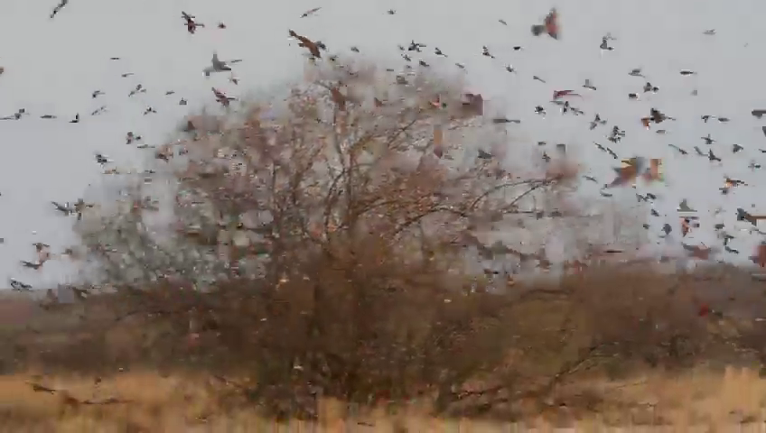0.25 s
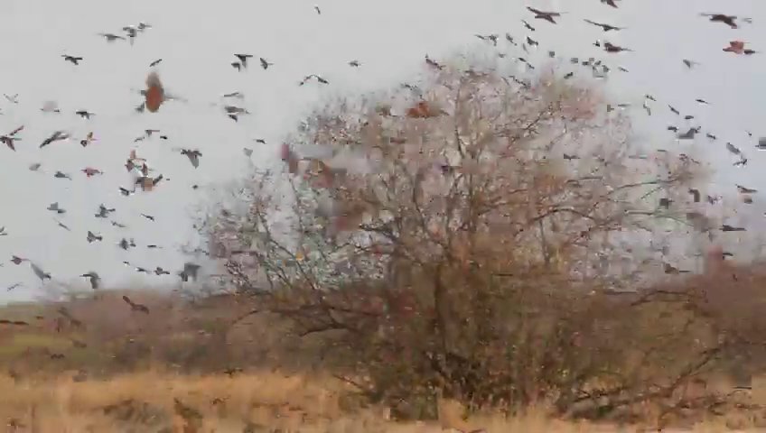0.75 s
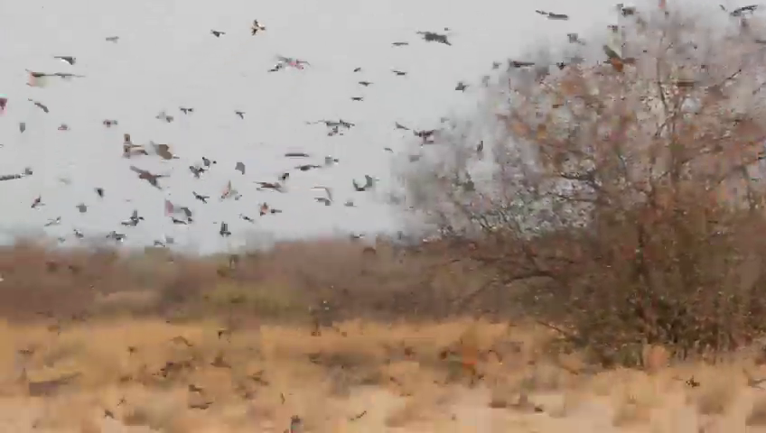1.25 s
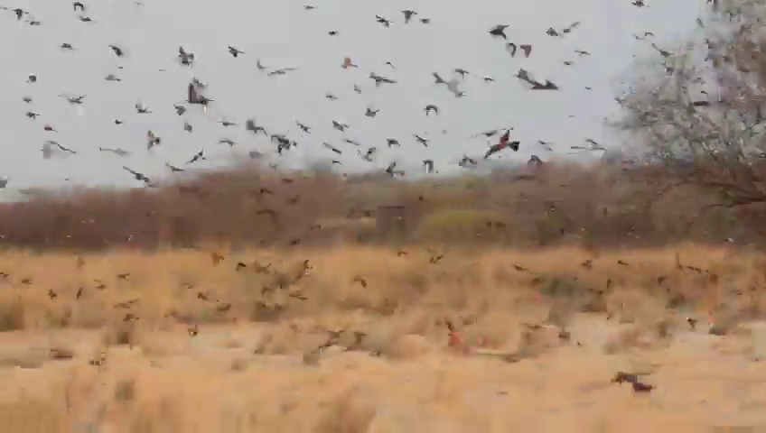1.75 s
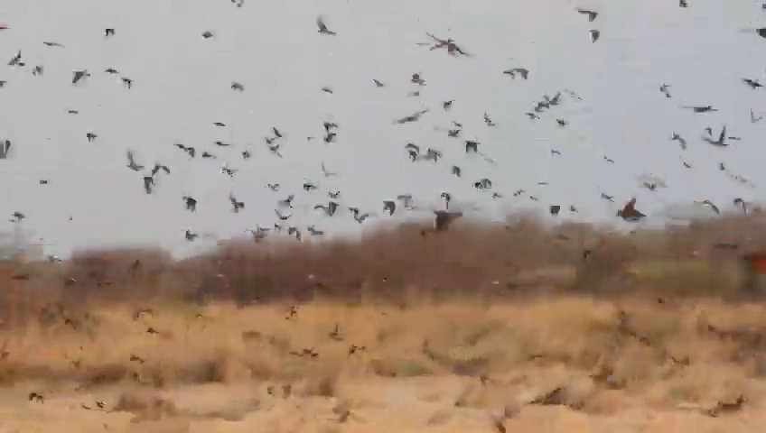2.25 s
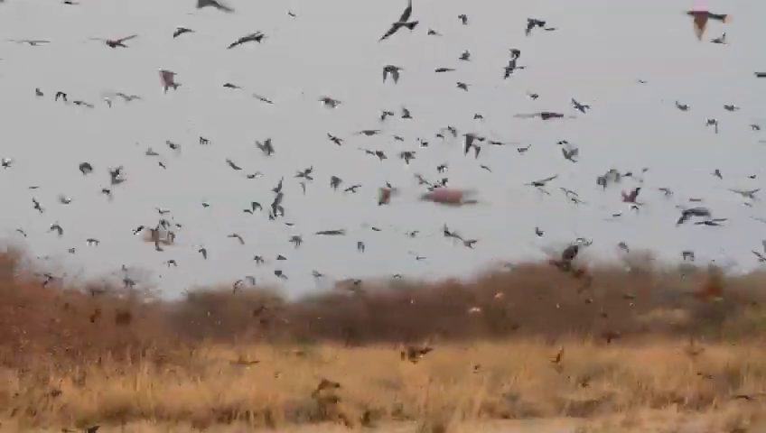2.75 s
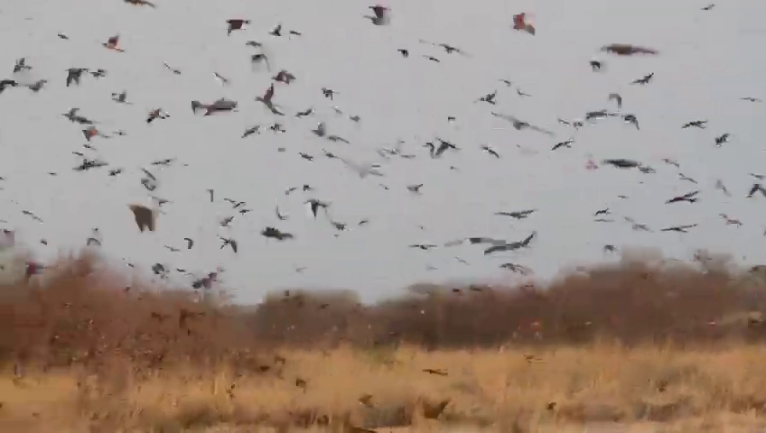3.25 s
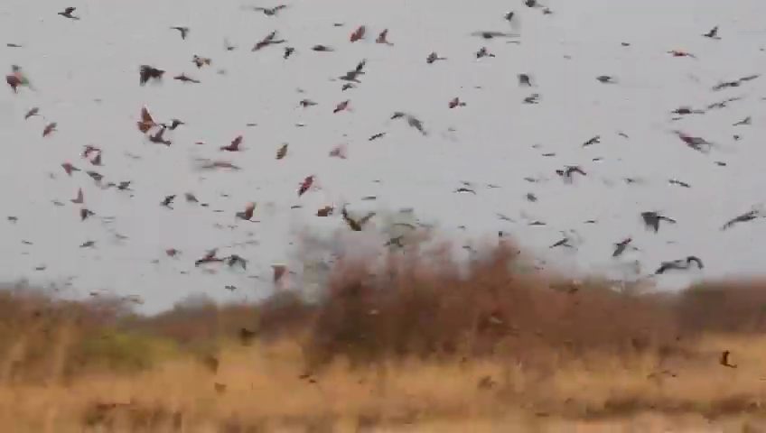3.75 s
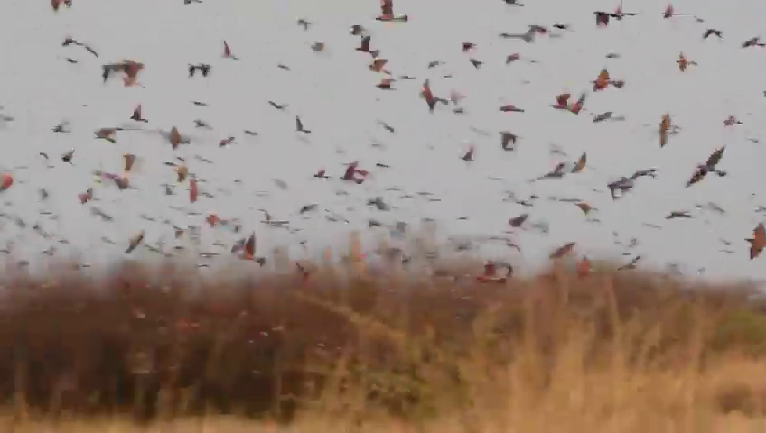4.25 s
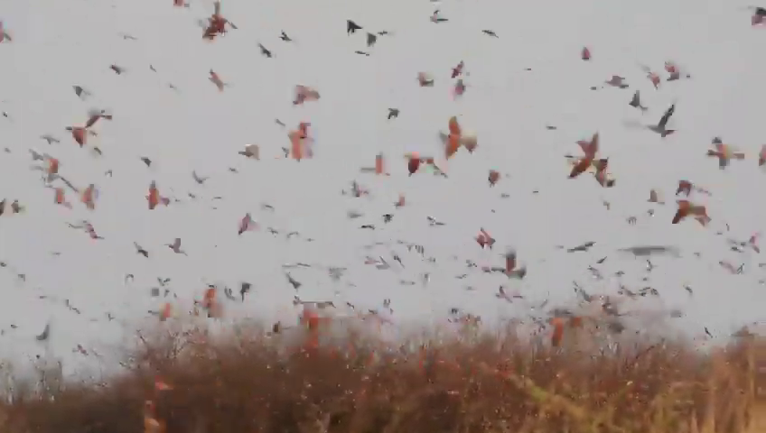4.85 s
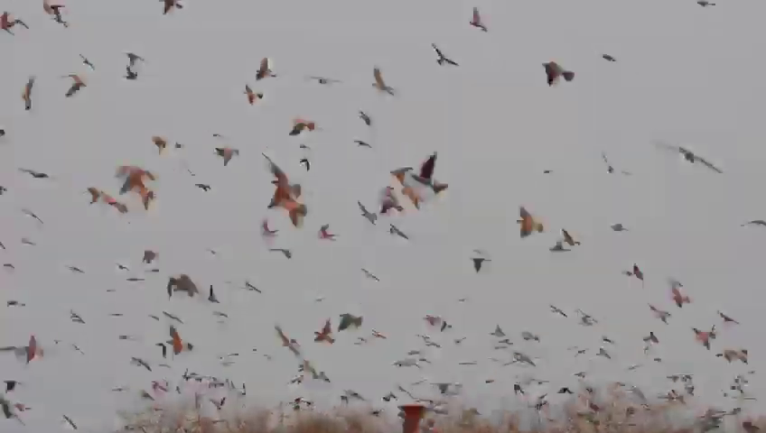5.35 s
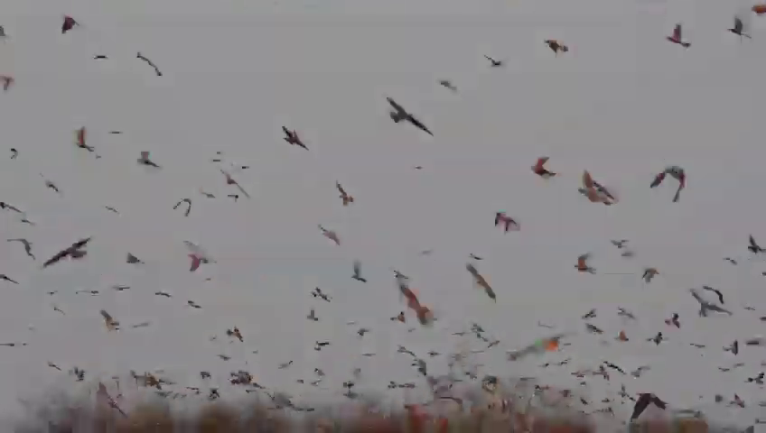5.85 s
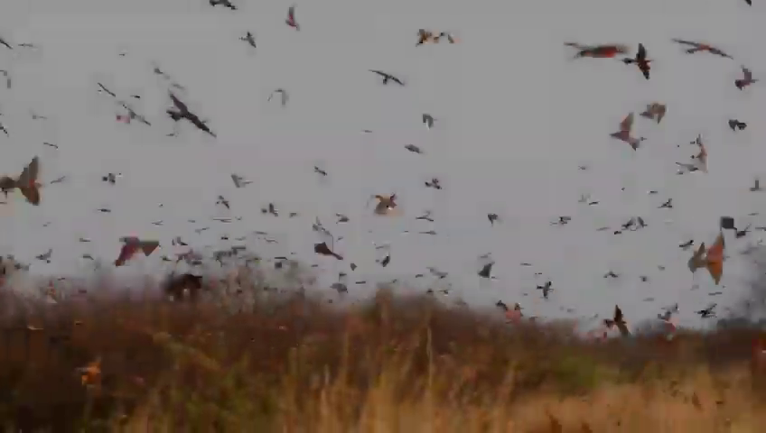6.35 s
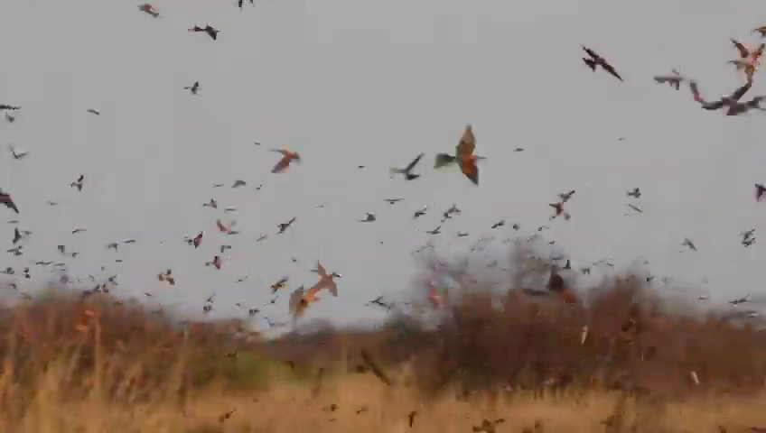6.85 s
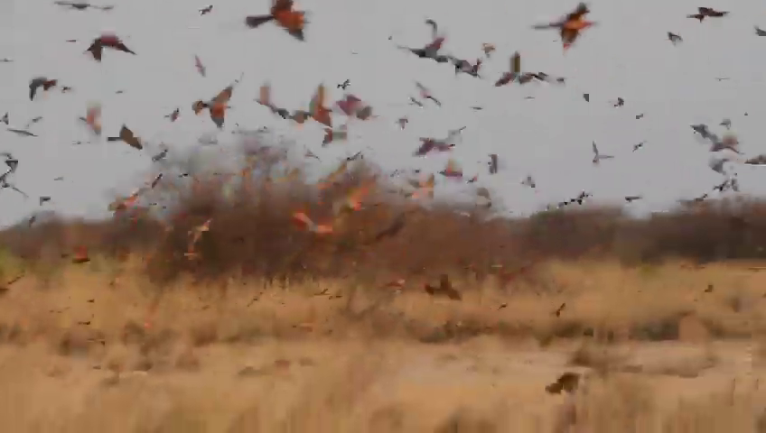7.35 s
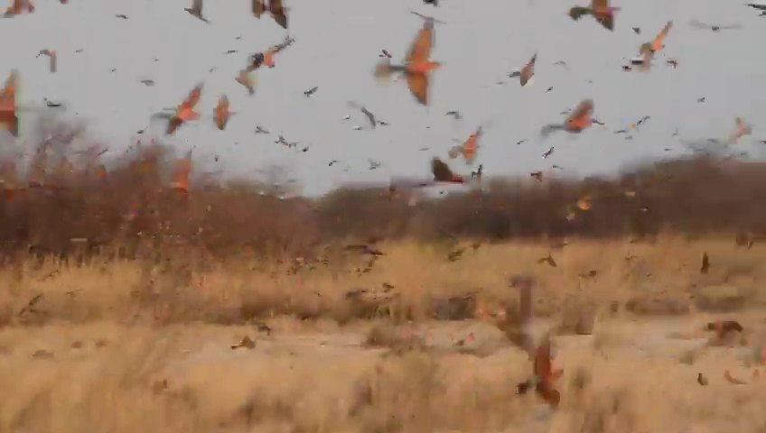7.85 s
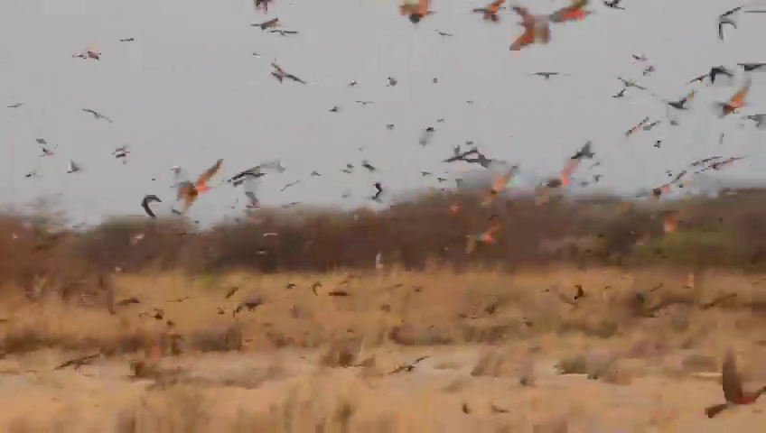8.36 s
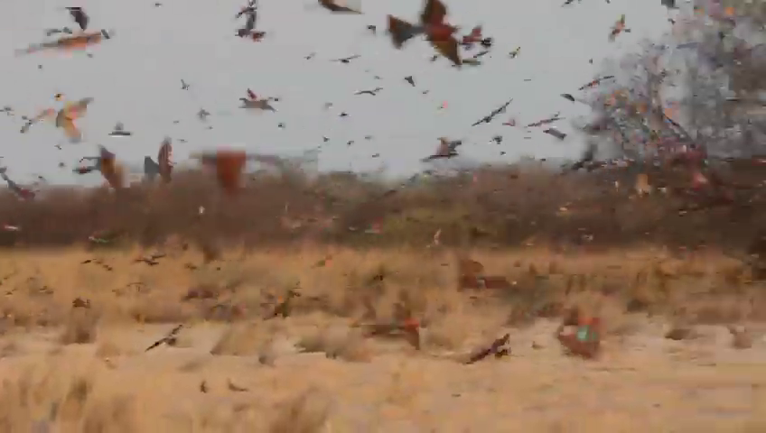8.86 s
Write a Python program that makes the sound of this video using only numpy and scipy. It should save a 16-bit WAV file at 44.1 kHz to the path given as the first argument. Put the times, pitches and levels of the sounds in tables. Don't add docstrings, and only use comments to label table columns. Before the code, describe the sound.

A large flock of bee-eaters over dry grass quickly fades in as a dense chorus of short, trilled croaks. Nearby birds call over it, the closest bursting out around two and a half seconds, and later calls sound duller. A low camera motor hums and rattles underneath, and a hand thumps the body near six seconds. Open air, close stereo microphones with a narrow image and little high treble.

```python
import sys
import numpy as np
from scipy import signal
from scipy.fft import rfft, irfft
from scipy.io import wavfile
from scipy.ndimage import uniform_filter1d

SR = 44100
rng = np.random.default_rng(int(sys.argv[2]) if len(sys.argv) > 2 else 0)


def boost(x):
    u = np.asarray(x, float) / 20
    return 10 ** u


def wav_out(sig):
    wavfile.write(sys.argv[1], SR, np.round(np.clip(np.atleast_2d(sig).T, -1, 1) * 32767).astype(np.int16))


N = 400869
MOTOR_HZ = 64.5
FADE_S = 0.35
PORTS = np.array([[1], [-1]])

# time in seconds, chorus level in dB.
FLOCK = [(0.0, -47), (0.15, -37.5), (0.35, -32), (1.57, -31), (2.05, -27), (2.3, -31), (2.83, -33.5),
         (2.99, -29.5), (3.42, -34), (3.67, -30), (3.97, -34), (4.66, -32.5), (5.57, -30.5), (5.75, -34),
         (6.89, -33.5), (8.36, -33.5), (9.09, -34)]


def evened(x):
    return x / np.sqrt(np.mean(x ** 2) + 1e-20)


def curve(rows, axis):
    return np.interp(np.arange(N) / SR, [r[0] for r in rows], [r[axis] for r in rows])


def colour(x, points):
    f, db = np.transpose(points)
    hz = np.fft.rfftfreq(N, 1 / SR)
    gain_db = np.interp(np.log(hz + 1), np.log(f), db)
    return irfft(rfft(x) * boost(gain_db), N)


def add(mix, s, sound):
    part = mix[..., round(s * SR):][..., :sound.shape[-1]]
    part += sound[..., :part.shape[-1]]


def wobble(count, size, smooth):
    noise = rng.standard_normal((count, size), dtype=np.float32)
    return evened(uniform_filter1d(uniform_filter1d(noise, smooth), smooth))


def air():
    # frequency in Hz, level in dB.
    wash_tone = [(15, -38), (40, -33), (100, -17), (300, -17.5), (600, -20.5), (1000, -5), (1900, 0.5),
                 (2300, 6), (3300, -16), (4500, -23.5), (8000, -32), (12400, -48)]
    # frequency in Hz, level in dB.
    hiss_tone = [(3000, -24), (5000, -31), (7000, -1.5), (9000, -1.5), (11000, -1), (11800, -8),
                 (12400, -14)]
    noise = rng.standard_normal((4, N))
    wash = colour(noise[0] + 0.029 * noise[1] * PORTS, wash_tone)
    hiss = colour(noise[2:], hiss_tone)
    return boost(-40) * evened(wash) + boost(-66.5) * evened(hiss)


def motor():
    # multiple of the motor turn rate, level in dB.
    orders = [(1, -62), (2, -57), (3, -55), (4, -60), (5, -74.5), (6, -66.5), (6.5, -88), (7, -65),
              (8, -63.5), (9.75, -61), (10.75, -58), (11.75, -57.5), (12.75, -65.5)]
    # time in seconds, hum level in dB.
    load = [(0.0, -67), (0.2, -51.5), (3.14, -50), (3.8, -54), (4.71, -53), (5.8, -54.5), (7.2, -54),
            (9.09, -57)]
    turn = 2 * np.pi * MOTOR_HZ * np.arange(N) / SR
    skew, drift_db = .2, .4
    hum = 0
    for k, db in orders:
        late = 0 if k > 1 else np.pi
        level = boost(db + drift_db * (1 + k / 3) * wobble(1, N, smooth=6000))
        hum = hum + level * np.cos(k * (turn - late - .45 * k) + skew * PORTS / k)
    return boost(curve(load, axis=1)) * evened(hum) * boost(.2 * PORTS)


def rattle():
    # frequency in Hz, level in dB.
    shell = [(150, -33), (280, -12), (400, 2), (600, 5), (900, -14), (1300, -29), (2500, -58)]
    # time in seconds, knocks in dB, buzz in dB.
    grip = [(0.0, -61, -64), (0.35, -53.5, -47.5), (1.04, -51.5, -56.5), (1.39, -48.5, -50),
            (2.3, -46.5, -59), (2.71, -50.5, -50.5), (3.1, -46, -57), (3.64, -46.5, -76), (4.38, -57, -70),
            (4.84, -56, -56), (5.32, -55.5, -67), (6.15, -46.5, -55), (6.5, -49, -52.5),
            (6.99, -41.5, -51.5), (7.8, -51.5, -54), (8.3, -59.5, -65), (9.09, -57, -64)]
    count = int(N / SR * MOTOR_HZ)
    size, pitch, late, side = rng.standard_normal((count, 4)).T
    knocks, t = np.zeros((2, N)), np.arange(600) / SR
    spread_db = 1.6
    for k in range(count):
        ring = np.sin(2 * np.pi * 810 * (1 + .08 * pitch[k]) * t)
        ring *= np.minimum(t / .0016, 1) * boost(-60 * t / .016)
        s = (k + 0.4014 + 0.02 * late[k]) / MOTOR_HZ
        add(knocks, s, boost(spread_db * size[k]) * ring * (1 + 0.033 * side[k] * PORTS))
    buzz = colour(rng.standard_normal(N) + 0.11 * rng.standard_normal(N) * PORTS, shell)
    knocks = boost(curve(grip, axis=1) - 2.0) * evened(knocks)
    return knocks + boost(curve(grip, axis=2) - 4.0) * evened(buzz)


def handling():
    # start in seconds, level in dB, frequency in Hz.
    bumps = [
        (0.189, -58, 56.5),
        (0.269, -54, 67),
        (0.389, -51, 75.4),
        (0.679, -56, 113),
        (0.738, -57, 113),
        (4.569, -63, 113),
        (5.219, -54, 113),
        (5.78, -59, 112),
        (5.879, -39.5, 113),
        (7.869, -65, 64.6),
    ]
    # start in seconds, level in dB, frequency in Hz, 60 dB decay in seconds.
    knock = (6.24, -45, 420, .07)
    out, t = np.zeros(N), np.arange(8000) / SR
    for s, db, hz, t60 in [(*row, 0.084) for row in bumps] + [knock]:
        decay = boost(db - 60 * t / t60) * np.minimum(t / 0.0031, 1)
        add(out, s, decay * np.sin(2 * np.pi * hz * t))
    return out * boost([[3], [-3]])


def croaks(s, db, hz, length, partials_db, arch, fall, trill, rough, spread, breath=.4):
    # frequency in Hz, level in dB.
    throat = [(20, 6.5), (2900, 1.5), (3150, -3.5), (3350, -3.5), (3550, 1.5), (3900, 1), (4300, -3.5),
              (12200, -2), (12450, -38), (22050, -60)]
    hz, length = hz[:, None], np.clip(length, .015, .07)[:, None]
    t = np.arange(3100, dtype=np.float32) / SR
    u = np.minimum(t / length, 1)
    chance = rng.random((len(s), 5)).T[..., None]
    beat = 2 * np.pi * ((120 + 70 * chance[0]) * t + chance[1])
    beat = beat + 1.216 * wobble(len(s), len(t), smooth=150)
    flutter = wobble(len(s), len(t), smooth=45)

    sag = fall * (.15 + 1.6 * chance[2]) * (.3 - u ** 1.8)
    pitch = hz * (1 - arch * np.exp(-u / .12) + sag)
    pitch *= 1 + .015 * np.sin(beat + 1.3) + rough * flutter
    turn = np.exp(2j * np.pi * np.cumsum(pitch, 1) / SR).astype(np.complex64)

    shape = np.minimum(u / .17, 1) * (.6 + .4 * np.sin(np.pi * u)) * np.minimum((1 - u) / .15, 1)
    shape *= np.maximum(1 + trill * (.5 + chance[3]) * np.sin(beat) + .25 * flutter[::-1], .05)
    rasp = 1 + breath * wobble(len(s), len(t), smooth=20)
    voice, partial = np.zeros(turn.shape, np.float32), turn
    for k in range(partials_db.shape[1]):
        voice += boost(partials_db[:, k, None]) * partial.imag * (rasp if k > 1 else 1)
        partial = partial * turn
    voice *= shape * boost(db)[:, None]

    lead = spread * (2 * chance[4] - 1)
    out = np.zeros((2, N))
    for at, sound, early in zip(s, voice, lead):
        add(out, at, np.array([sound, early * sound]))
    side = np.gradient(out[1])
    return colour(np.array([out[0] + side, out[0] - side]), throat)


def far_birds():
    # multiple of the fundamental, level in dB.
    overtones = [(1, -9.5), (3, -24), (4, -33), (5, -35), (6, -48), (7, -44), (8, -44)]
    when, pitch, size, far, long, low = rng.random((1550, 6)).T
    partials_db = np.array([[db for k, db in sorted(overtones + [(2, 0.045)])]])
    partials_db = partials_db + np.outer(14 * (low - .6), np.arange(8) == 0)
    birds = croaks(when * N / SR, -17 * far, 1200 + 170 * (pitch + size), .025 + 0.03034 * long,
                   partials_db, arch=0.1014, fall=.27, trill=0.79, rough=.017, spread=.6)
    return boost(curve(FLOCK, axis=1) + 0.5) * evened(birds)


def passing_birds():
    late, pitch, far, long, bright = rng.random((110, 5)).T
    s = (np.arange(len(late)) + late) / len(late) * (N / SR - .3) + .2
    top_db = -50 + 14 * bright
    partials_db = np.transpose([-16 + 11 * far, 0 * s, top_db + 22, top_db + 14, top_db + 4.5,
                                top_db - 10, top_db - 2.5, top_db - 4])
    birds = croaks(s, -8 * far, 1200 + 230 * pitch, .025 + .03 * long,
                   partials_db, arch=.05, fall=.26, trill=0.21, rough=.012, spread=0.4)
    return boost(curve(FLOCK, axis=1) - 2.5) * birds


def squeaks():
    # start in seconds, level in dB, second partial in Hz, partials 3-5 in dB, length in seconds.
    calls = [
        (8.817, -44.5, 2770, 10, 0.027),
        (8.83, -47, 3250, 5, 0.039),
        (2.905, -28, 2900, -13, 0.042),
        (3.555, -33, 2750, -13.5, 0.064),
        (8.405, -37, 2800, -8.5, 0.0326),
        (7.1, -35.5, 2850, -8, 0.035),
    ]
    s, db, hz, mid_db, length = np.transpose(calls)
    top_db = mid_db - 20.5
    partials_db = np.transpose([0 * s - 8, 0 * s, mid_db, mid_db - 11, mid_db - 15,
                                top_db - 7, top_db - 6, top_db])
    return croaks(s, db, hz / 2, length, partials_db, arch=.1, fall=.12, trill=.3, rough=.012, spread=.5)


def near_birds():
    # start in seconds, level in dB, second partial in Hz,
    # partials 6-9 in dB, length in seconds.
    facing = [(0.476, -15, 2813, -37.5, .056), (0.918, -13, 2856, -36, 0.045),
              (0.959, -16, 2775, -35, .048), (1.235, -17.5, 2734, -26, 0.031),
              (1.333, -12, 2800, -36, 0.045), (1.518, -11.5, 2735, -34.5, 0.047),
              (1.879, -12, 2756, -29, 0.046), (2.251, -19, 2656, -38, 0.041), (2.33, -18, 2740, -33, .023),
              (2.451, -6.5, 2900, -33, 0.041), (2.482, -5, 2610, -27, 0.048),
              (2.617, -13, 2625, -40, 0.049), (2.8073, -12, 2490, -24, 0.053), (3, -16, 2670, -30, 0.054),
              (3.096, -16, 2800, -37, 0.063), (3.464, -14.5, 2656, -36.5, 0.055),
              (3.767, -16.5, 2483, -39, 0.0543), (3.803, -15.5, 2654, -39, 0.057),
              (4.222, -18, 2617, -37, 0.045), (5.021, -15.5, 2720, -35, 0.05),
              (5.344, -15.5, 2695, -37, .045), (5.6584, -11.5, 2925, -39, 0.029),
              (7.952, -17.5, 2680, -32, .08), (8.256, -15.5, 2593, -40, 0.061)]
    # start in seconds, level in dB, second partial in Hz, length in seconds.
    away = [(0.378, -14.5, 2775, 0.051), (0.815, -16.5, 2750, 0.067), (0.868, -12, 2990, .06),
            (1.169, -16, 2843, 0.06), (1.637, -19, 2560, 0.074), (1.821, -20, 2770, 0.0334),
            (1.976, -14, 3010, 0.026), (2.036, -10, 3002, .035), (3.058, -16, 2617, .07),
            (3.4055, -18, 2780, 0.057), (3.703, -18, 2660, .029), (3.9715, -18.5, 2740, 0.04),
            (4.598, -16, 2700, .065), (4.7973, -21, 2708, 0.029), (4.985, -20, 2967, 0.032),
            (5.096, -18, 2670, 0.063), (5.6265, -19.5, 2833, .039), (6.161, -17.5, 2697, .055),
            (6.331, -17, 2714, 0.029), (6.674, -17, 2815, .031), (6.789, -16, 2680, 0.0282),
            (6.863, -19.5, 2623, 0.033), (7.101, -14.5, 2685, .044), (7.369, -19.5, 2787, .06),
            (7.558, -14, 2750, .055), (7.659, -18.5, 2847, 0.057), (7.73, -18, 2546, 0.0264),
            (8.057, -17.5, 2610, 0.041), (8.651, -21.5, 2725, 0.041), (8.862, -16.5, 3035, 0.042)]
    dull = [(s, db, hz, -44, length) for s, db, hz, length in away]
    s, db, hz, top_db, length = np.transpose(facing + dull)
    mid_db = -32 + 0.35 * (top_db + 37)
    partials_db = np.transpose([0 * s - 12, 0 * s, mid_db + 6.5, mid_db - 1.5, mid_db - 2.5,
                                top_db - 10, top_db - 2.5, top_db - 3.5, top_db - 6.0])
    birds = croaks(s - .003, db - 11.0, hz / 2, length, partials_db,
                   arch=0.047, fall=.17, trill=.5, rough=.018, spread=.5, breath=.65)
    return birds + boost(-9.5) * np.roll(birds, 260, axis=1)


def scene():
    fade = np.minimum(np.arange(N) / SR / FADE_S + 0.18, 1)
    camera = motor() + rattle() + handling()
    return fade * air() + camera + far_birds() + passing_birds() + squeaks() + near_birds()


def thinned(x):
    # frequency in Hz, share of mid (0-1), share of side (0-1).
    dropped = [(300, 0, .6), (900, 0, .5), (2600, 0, .3), (3100, 0, .4), (3300, .25, .7), (3700, .28, .8),
               (3950, .06, .88), (5800, .03, .88), (8000, .06, .35), (10800, .06, .25), (11500, .3, .45),
               (12100, .75, .75)]
    hz, t, z = signal.stft([x[0] + x[1], x[0] - x[1]], SR, nperseg=2048)
    calls = (abs(z[0, 90:150]) ** 2).sum(0) ** .5
    calls *= np.minimum(t / FADE_S + .1, 1)
    f, *shares = np.transpose(dropped)
    for lo in range(0, 580, 12):
        side_luck_db = 14 if lo < 150 else 2.5
        for part, share, luck_db in zip(z, shares, (0, side_luck_db)):
            ratio = uniform_filter1d((abs(part[lo:lo + 12]) ** 2).sum(0) / calls, 3)
            ratio *= boost(luck_db * rng.standard_normal(len(t)))
            part[lo:lo + 12] *= ratio >= np.quantile(ratio, np.interp(hz[lo + 6], f, share))
    mid, side = signal.istft(z, SR, nperseg=2048)[1][:, :N]
    return np.array([mid + side, mid - side]) / 2


def roll_off(x):
    return signal.sosfilt(signal.butter(12, 12400, fs=SR, output="sos"), x)


def record(dry):
    ceiling = .8
    dry = signal.sosfilt(signal.butter(2, 42, 'high', fs=SR, output='sos'), dry)
    mix = thinned(ceiling * np.tanh(dry / ceiling))
    return roll_off(mix)


dry = scene()
out = record(dry)
wav_out(out)
```